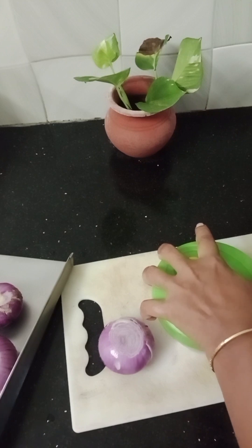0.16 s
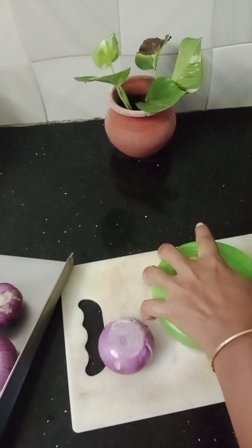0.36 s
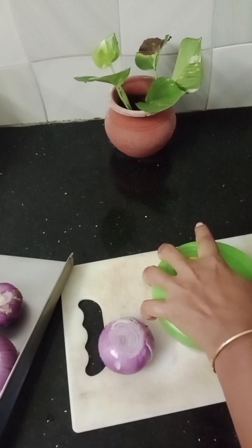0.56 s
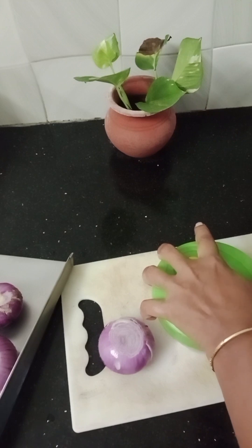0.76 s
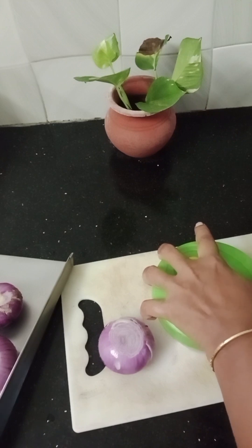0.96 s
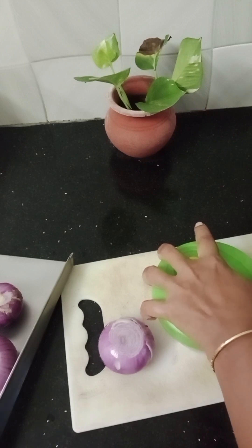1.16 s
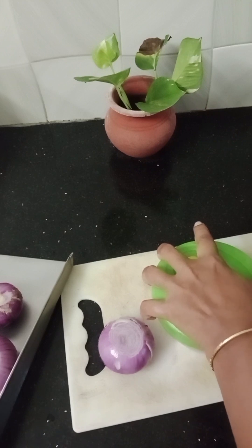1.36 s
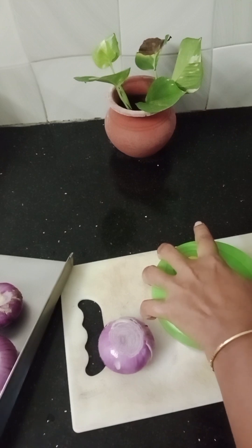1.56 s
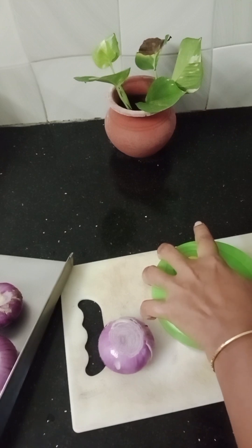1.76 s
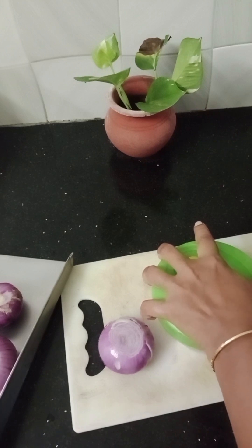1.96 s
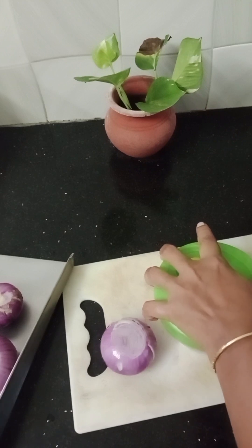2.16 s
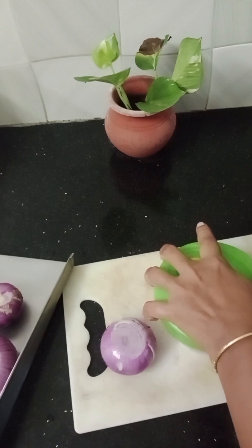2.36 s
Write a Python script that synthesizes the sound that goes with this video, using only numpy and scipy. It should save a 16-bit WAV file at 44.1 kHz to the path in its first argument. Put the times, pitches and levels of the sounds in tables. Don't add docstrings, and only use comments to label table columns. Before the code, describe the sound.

Four rasping pulls of a hand chopper batter onion in a plastic bowl, with soft rewinds between

```python
import sys
import numpy as np
from scipy import signal
from scipy.fft import rfft, irfft
from scipy.io import wavfile

SR = 44100
rng = np.random.default_rng(int(sys.argv[2]) if len(sys.argv) > 2 else 0)


def store_wav(level_fs):
    pcm = np.round(np.clip(np.atleast_2d(level_fs), -1, 1) * 32767)
    wavfile.write(sys.argv[1], SR, pcm.T.astype(np.int16))


def gain_from_decibels(decibels):
    exponent = np.asarray(decibels, float) / 20
    return 10 ** exponent


N = 110250

# frequency in Hz, level in dB per Hz.
BOWL_COLOUR = [(60, -32.5), (150, -9), (400, -1.5), (900, 2.5), (1700, -3), (3500, -13), (7000, -26.5),
               (15000, -36.5)]
# frequency in Hz, level in dB per Hz.
CORD_COLOUR = [(80, -14), (200, -8), (400, -3), (800, -2.5), (1700, -4), (3200, -11.5), (7500, -14),
               (15000, -15.5)]
# frequency in Hz, width in Hz, height in dB.
BOWL_RINGS = [(255, 120, 0.5), (605, 17, 2), (686, 20, 6), (855, 28, 2.5), (1050, 22, 2.5),
              (1580, 120, 5.5), (1860, 57, 3.5), (2750, 114, 7), (3174, 300, 5), (3660, 167, 7),
              (7170, 1400, 7.5), (8330, 600, 3.5), (10480, 1060, 4)]


def rms_one(x):
    return x / np.sqrt(np.mean(x ** 2) + 1e-20)


def drift(rate_hz):
    pole = np.exp(-2 * np.pi * rate_hz / SR)
    noise = rng.standard_normal(N + SR)
    return rms_one(signal.lfilter([1], [1, -2 * pole, pole * pole], noise)[SR:])


def colour(x, slope, bumps, depth=0.85):
    size = 2 ** 17
    hz = np.maximum(np.arange(size // 2 + 1) * SR / size, 10)
    db = np.interp(np.log(hz), np.log([p[0] for p in slope]), [p[1] for p in slope])
    db = db + depth * sum(d / (1 + (2 * (hz - f) / w) ** 2) for f, w, d in bumps)
    cepstrum = irfft(db * np.log(10) / 20)
    cepstrum[1:size // 2] *= 2
    cepstrum[size // 2 + 1:] = 0
    response = np.exp(rfft(cepstrum))
    return irfft(rfft(x, size) * response)[:N]


def brighten(x, corner_hz, gain):
    low = signal.sosfiltfilt(signal.butter(2, corner_hz, fs=SR, output="sos"), x)
    return low + gain * (x - low)


def strokes(tables, rise_s, fall_s):
    t = np.arange(N) / SR
    gain = np.zeros(N)
    for rows in tables:
        s, db = np.transpose(rows)
        fade_in = np.clip(1 + (t - s[0]) / rise_s, 0, 1)
        fade_out = np.clip(1 + (s[-1] - t) / fall_s, 0, 1)
        gain += gain_from_decibels(np.interp(t, s, db)) * fade_in * fade_out
    return gain


def grains(per_s, spread_db, own_db, smooth):
    at = np.flatnonzero(rng.random(N) < per_s / SR)
    sizes = gain_from_decibels(spread_db * np.minimum(rng.exponential(1, N), 4)) * rng.choice([-1, 1], N)
    edges_hz = 40 * 2 ** np.arange(0, 9.1, 0.5)
    contacts = np.zeros(N)
    for low_hz, high_hz in zip(edges_hz, edges_hz[1:]):
        clicks = np.full(N, 1e-18)
        band_sizes = sizes * gain_from_decibels(own_db * rng.standard_normal(N))
        clicks[at] = band_sizes[at]
        band = signal.butter(1, [low_hz, high_hz], "band", fs=SR, output="sos")
        contacts += signal.sosfilt(band, rms_one(clicks))
    return rms_one(contacts) + smooth * rng.standard_normal(N)


def blows(rows, rise_s, t60_s, slope):
    t = np.arange(N) / SR
    gain = np.zeros(N)
    for s, db in rows:
        decay = gain_from_decibels(db - 60 * np.clip(t - s, 0, 1) / t60_s)
        gain += decay * np.clip((t - s) / rise_s, 0, 1)
    noise = rng.standard_normal(N)
    unit_level = np.std(colour(noise, slope, BOWL_RINGS))
    return colour(gain * noise, slope, BOWL_RINGS) / unit_level


def blades():
    # time in seconds, level in dB.
    pulls = [
        [(0.168, -44.5), (0.244, -31.5), (0.258, -27.5), (0.27, -28.5), (0.278, -26.5), (0.382, -33.5),
         (0.41, -47), (0.5, -50.5)],
        [(0.77, -42), (0.79, -43.5), (0.816, -32), (0.848, -33), (0.9, -25), (0.908, -32), (0.946, -28.5),
         (1.11, -50.5)],
        [(1.378, -36), (1.408, -37.5), (1.43, -30), (1.44, -34), (1.496, -28), (1.578, -34.5), (1.648, -47),
         (1.71, -51)],
        [(1.978, -42.5), (1.992, -41.5), (2.048, -34.5), (2.144, -31), (2.32, -58.5)],
    ]
    # time in seconds, gain in dB.
    piece_fineness = [(.3, -2), (.9, -0.5), (1.5, 1.3), (2.1, 3)]
    blade_hz, wander, throb_db = 48, 0.15, 2.2
    turns = np.cumsum(blade_hz * (1 + wander * drift(4))) / SR
    throb = gain_from_decibels(throb_db * np.cos(2 * np.pi * turns) + 0.78 * drift(25))
    pieces = grains(per_s=2500, spread_db=3, own_db=6.5, smooth=0.81)
    crunch = rms_one(colour(throb * pieces, BOWL_COLOUR, BOWL_RINGS))

    effort = strokes(pulls, rise_s=0.015, fall_s=0.045)
    share = effort / gain_from_decibels(-32)
    fine = gain_from_decibels(np.interp(np.arange(N) / SR, *np.transpose(piece_fineness)))
    crunch = brighten(crunch, 1500, share ** 0.2)
    crunch = brighten(crunch, 4800, fine * share ** 0.3)
    return gain_from_decibels(-2) * effort * crunch


def chops():
    # start in seconds, peak level in dB.
    strikes = [(0.245, -17), (0.254, -39), (0.278, -14), (0.295, -11), (0.312, -33), (0.344, -23),
               (0.825, -37), (0.862, -21), (0.879, -11), (0.893, -14), (1.429, -16), (1.469, -26),
               (1.49, -9), (1.505, -27), (1.546, -14), (2.011, -22.5), (2.035, -29), (2.049, -13.5),
               (2.093, -12), (2.13, -19)]
    return gain_from_decibels(-9) * blows(strikes, rise_s=0.003, t60_s=0.028, slope=BOWL_COLOUR)


def cord():
    # time in seconds, level in dB.
    rewinds = [
        [(0.0, -55.5), (0.026, -54.5), (0.032, -52.5), (0.108, -68), (0.114, -89), (0.14, -63.5)],
        [(0.478, -90), (0.484, -69), (0.518, -55), (0.536, -58.5), (0.59, -52.5), (0.682, -60.5), (0.745, -74)],
        [(1.06, -68), (1.108, -52), (1.184, -54.5), (1.194, -47.5), (1.226, -56), (1.254, -51.5), (1.345, -74)],
        [(1.68, -79), (1.684, -57), (1.688, -56), (1.792, -51.5), (1.886, -59.5), (1.95, -94)],
        [(2.26, -76.5), (2.368, -53), (2.398, -60), (2.412, -54.5), (2.5, -69)],
    ]
    flutter = gain_from_decibels(1.04 * drift(45) + 0.72 * drift(6.2))
    hiss = flutter * grains(per_s=3000, spread_db=2, own_db=6, smooth=0.72)
    hiss = rms_one(colour(hiss, CORD_COLOUR, BOWL_RINGS, depth=1.14))
    return gain_from_decibels(8.5) * strokes(rewinds, rise_s=0.0024, fall_s=0.11) * hiss


def clutch():
    # start in seconds, peak level in dB.
    catches = [
        (0.146, -41),
        (0.151, -23),
        (0.755, -25.5),
        (1.359, -16.5),
        (1.959, -20),
        (1.965, -34),
    ]
    # frequency in Hz, level in dB per Hz.
    click_colour = [(80, -46), (300, -0.5), (600, 2.5), (1400, -2), (3000, -14), (7500, -29.5),
                    (15000, -34)]
    return gain_from_decibels(-12) * blows(catches, rise_s=0.0015, t60_s=0.05, slope=click_colour)


def spool():
    # start in seconds, peak level in dB.
    knocks = [
        (0.031, -39),
        (0.512, -49.5),
        (0.582, -24.5),
        (1.19, -30),
        (1.78, -17.5),
        (2.329, -30),
        (2.405, -23.5),
    ]
    return gain_from_decibels(-14.5) * blows(knocks, rise_s=0.009, t60_s=0.091, slope=CORD_COLOUR)


def blade_tips():
    # start in seconds, peak level in dB.
    ticks = [(0.1466, -51), (0.2783, -49), (0.2984, -45), (0.5127, -41), (0.7592, -31.5), (0.8624, -45),
             (0.9035, -37), (1.4661, -25), (1.482, -29), (1.5207, -30), (1.5334, -28), (1.7407, -35),
             (2.154, -33), (2.285, -40)]
    # frequency in Hz, level in dB per Hz.
    tick_colour = [(1000, -25), (4000, 7), (7000, 4), (15000, -14)]
    return gain_from_decibels(-6.5) * blows(ticks, rise_s=0.00023, t60_s=0.0063, slope=tick_colour)


def kitchen(x):
    t60_s, wall_delay_s, wall_cut_hz = 0.41, 0.0067, 10200
    t = np.arange(SR // 2) / SR
    pole = np.exp(-2 * np.pi * wall_cut_hz / SR)
    echoes = signal.lfilter([1], [1, -pole], rng.standard_normal(len(t)))
    echoes = signal.lfilter([1, 1], [1], echoes)
    echoes = echoes * gain_from_decibels(-60 * t / t60_s) * np.clip(t / wall_delay_s - 1, 0, 1)
    return gain_from_decibels(-8) * signal.fftconvolve(x, echoes / np.sqrt(np.sum(echoes ** 2)))[:N]


def room_floor():
    # frequency in Hz, level in dB per Hz.
    floor_colour = [(40, -48), (150, -27), (400, -7), (1600, -18), (3000, -17.5), (7500, -21),
                    (11000, -24.5), (15500, -38)]
    return gain_from_decibels(-62.5) * rms_one(colour(rng.standard_normal(N), floor_colour, []))


def scene():
    chopper = blades() + chops() + cord() + clutch() + spool() + blade_tips()
    return (chopper + kitchen(chopper) + room_floor())[None]


def top_cut(x):
    return signal.sosfilt(signal.butter(12, 15920, fs=SR, output="sos"), x)


def record(dry):
    # frequency in Hz, width in Hz, height in dB.
    port_notches = [(4850, 370, -8.5), (4937, 2180, -17), (9220, 200, -7), (13900, 890, -8),
                    (15300, 810, 0)]
    x = colour(dry[0], [(20, 0), (20000, 0)], port_notches)[None]
    x = signal.sosfilt(signal.butter(2, 65, "high", fs=SR, output="sos"), x)
    x = signal.sosfilt(signal.ellip(14, 0.3, 70, 15760, fs=SR, output="sos"), x)
    return top_cut(x)


dry = scene()
out = record(dry)
store_wav(out)
```